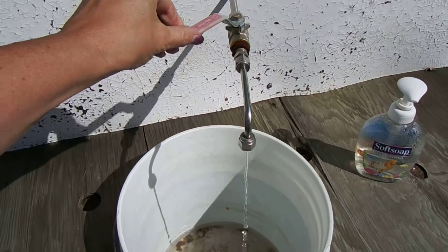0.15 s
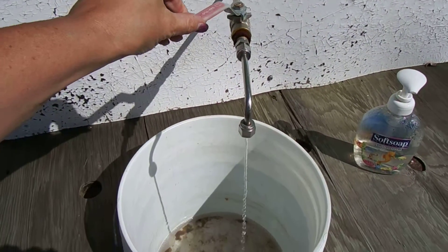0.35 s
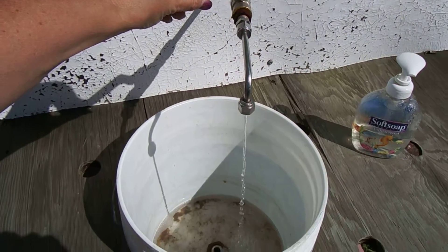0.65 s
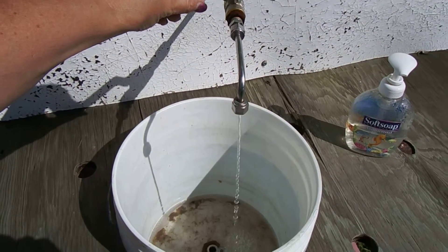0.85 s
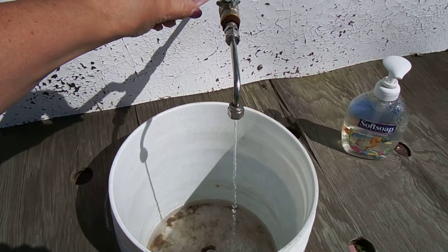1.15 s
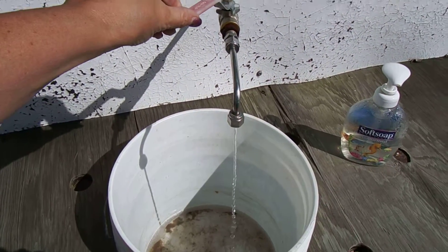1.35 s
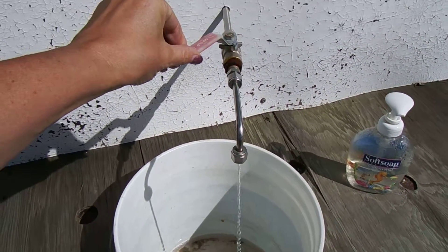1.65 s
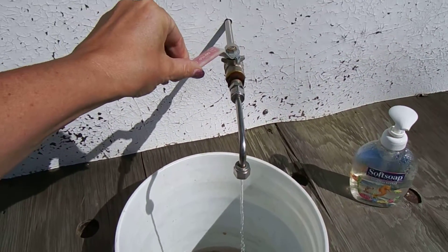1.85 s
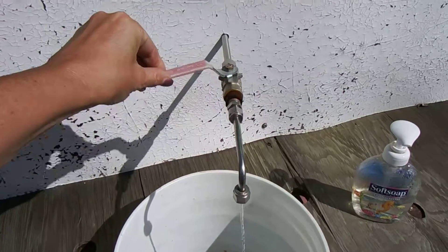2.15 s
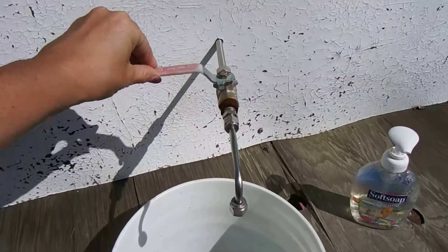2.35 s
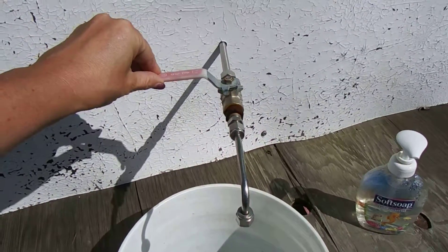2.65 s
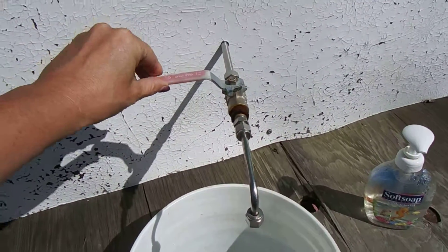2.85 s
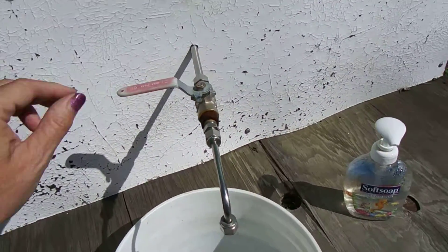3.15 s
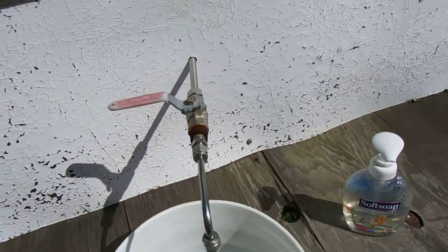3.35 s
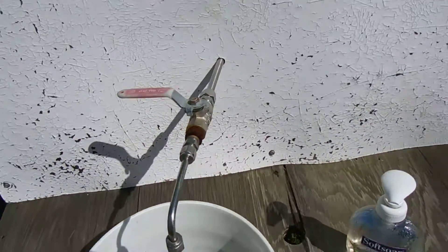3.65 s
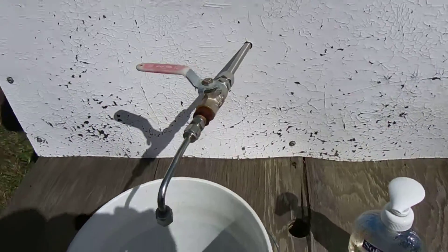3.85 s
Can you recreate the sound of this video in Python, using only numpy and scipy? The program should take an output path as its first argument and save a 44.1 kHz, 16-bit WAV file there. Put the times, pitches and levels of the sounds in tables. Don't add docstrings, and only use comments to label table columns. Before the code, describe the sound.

Close handheld microphone outdoors: water trickles and splashes into a hollow bucket from the start, breaks into last drops as the valve shuts, then near quiet with faint wind rumble, distant traffic and soft handling bumps.

```python
import sys
import numpy as np
from scipy import signal
from scipy.fft import rfft, irfft
from scipy.io import wavfile
from scipy.ndimage import uniform_filter1d

SR = 44100
rng = np.random.default_rng(int(sys.argv[2]) if len(sys.argv) > 2 else 0)


def gain_from_db(level_db):
    decades = np.asarray(level_db, float) / 20
    return 10 ** decades


def dump(signal):
    limited = np.clip(np.atleast_2d(signal).T, -1, 1)
    pcm = np.round(limited * 32767).astype(np.int16)
    wavfile.write(sys.argv[1], SR, pcm)


N = 176400
TIME = np.arange(N) / SR
BINS = np.fft.rfftfreq(8192, 1 / SR)


def evened(x):
    return x / np.sqrt(np.mean(x ** 2) + 1e-20)


def read(points, hz):
    f, value = np.transpose(points)
    return np.interp(np.log(hz + 1), np.log(f + 1), value)


def causal(x, gain):
    log = np.log(np.maximum(np.r_[gain, gain[-2:0:-1]], 1e-5))
    taps = np.fft.ifft(np.exp(log - 1j * signal.hilbert(log).imag)).real[:4096]
    return signal.oaconvolve(x, taps[None], axes=1)[:, :N]


def coloured(x, gain):
    return causal(x[None], gain)[0]


def highpass(x, order, hz):
    return signal.sosfilt(signal.butter(order, hz, "high", fs=SR, output="sos"), x)


def peaks(table, order=1):
    return sum(gain_from_db(db) ** 2 / (1 + (2 * (BINS - f) / w) ** 2) ** order for f, w, db in table)


def slow(seconds):
    size = max(int(seconds * SR), 2)
    return evened(uniform_filter1d(uniform_filter1d(rng.standard_normal(N), size), size))


def decay(samples, t60):
    return gain_from_db(-60 * np.arange(samples) / SR / t60)


def ping(hz, t60, rise, attack=.0003):
    t = np.arange(int(t60 * SR) + 8) / SR
    tone = np.sin(2 * np.pi * hz * t * (1 + rise * t / t60))
    return (1 - np.exp(-t / attack)) * gain_from_db(-60 * t / t60) * tone


def add(mix, s, sound):
    part = mix[..., round(s * SR):][..., :sound.shape[-1]]
    part += sound[..., :part.shape[-1]]


def scatter(x):
    z = signal.stft(x, nperseg=64)[2]
    turn = np.exp(2j * np.pi * rng.random((2,) + z.shape))
    return 1.25 * signal.istft(z * turn, nperseg=64)[1][:, :N]


def ports(shared, own, pan, lead, same):
    hz = np.fft.rfftfreq(N, 1 / SR)
    middle, sides = rfft(shared), rfft(own)
    likeness = np.sqrt(np.clip(read(same, hz), 0, 1))
    unlike = np.sqrt(1 - likeness ** 2)
    turn = gain_from_db(read(pan, hz) / 2) * np.exp(.5j * read(lead, hz))
    left = (likeness * middle + unlike * sides[0]) * turn
    right = (likeness * middle + unlike * sides[1]) / turn
    return irfft(np.array([left, right]), N)


# (frequency [Hz], density [dB per Hz])
TRAFFIC_COLOUR = [(30, -35), (140, -2.5), (1700, -9.5), (2100, -18.5), (4600, -24), (5600, -44),
                  (8500, -33), (12000, -38)]
# (frequency [Hz], left over right [dB])
TRAFFIC_PAN = [(100, -1), (800, -2), (1800, -8.5), (4200, -16), (6800, -24), (8500, -16)]
# (frequency [Hz], left leads by [radians])
TRAFFIC_LEAD = [(200, .2), (1000, -.5), (1700, -.2), (2200, 1.5), (3500, 1.2), (9000, 3)]
# (frequency [Hz], likeness [0-1])
TRAFFIC_SAME = [(60, .3), (300, .9), (1500, .85), (2200, .4), (4500, .2), (9000, .7)]
# (frequency [Hz], width [Hz], level [dB])
HOLLOW_MODES = [(154.7, 46.5, -12), (318, 35, -11.5), (364.8, 31.2, 0.5), (419.6, 29.3, -4)]


def traffic():
    colour = np.sqrt(gain_from_db(read(TRAFFIC_COLOUR, BINS)) ** 2 + gain_from_db(-1.5) ** 2 * peaks(HOLLOW_MODES))
    air = causal(rng.standard_normal((3, N)), colour) * gain_from_db(.5 * slow(.05))
    return gain_from_db(-49.5) * evened(ports(air[0], air[1:], TRAFFIC_PAN, TRAFFIC_LEAD, TRAFFIC_SAME))


# (time [s], level [dB])
WIND_LEVEL = [
    (0, -76),
    (2.38, -80),
    (2.47, -66),
    (2.7, -60),
    (2.95, -72),
    (3.27, -63),
    (3.5, -71),
    (4, -65),
]


def wind():
    gusts = rng.standard_normal((2, N)) * gain_from_db(4.2 * np.array([slow(.05), slow(.034)]))
    rumble = evened(causal(gusts, np.sqrt(peaks([(78.4, 54, 0)], order=2))))
    return gain_from_db(np.interp(TIME, *np.transpose(WIND_LEVEL))) * rumble


# (time [s], peak [dB], pitch [Hz])
HAND_BUMPS = [
    (2.695, -45, 105),
    (2.733, -38, 150),
    (3.265, -49, 85),
    (3.81, -45, 150),
    (2.47, -47, 70),
    (.343, -48, 40),
]


def hand_bumps():
    out = np.zeros((2, N))
    for at, db, hz in HAND_BUMPS:
        cycles = np.arange(-2, 2, hz / SR)
        bump = np.exp(-(cycles / 0.99) ** 2) * np.cos(2 * np.pi * cycles)
        add(out, at - 2 / hz, gain_from_db(db) * gain_from_db([[-3.], [2.4]]) * bump)
    return out


# (time [s], peak [dB])
FILM_TICKS = [(2.6015, -31.5), (2.895, -42), (2.8995, -41), (2.944, -40.5), (2.9914, -42), (3.4653, -41),
              (3.4885, -47), (3.5493, -35), (3.5915, -40), (3.6157, -35.5), (3.6653, -38)]
# (frequency [Hz], width [Hz], level [dB])
FILM_COLOUR = [(8550, 1100, 1.5), (4430, 1000, -9), (6900, 1100, -21)]


def film_ticks():
    ticks = np.zeros(N)
    for at, db in FILM_TICKS:
        add(ticks, at, gain_from_db(db) * rng.standard_normal(500) * decay(500, 0.025))
    return gain_from_db(3.0) * coloured(ticks, np.sqrt(peaks(FILM_COLOUR)))


RISE, SPLAT_RISE = 0.061, 0.0017

# (time [s], peak [dB], pitch [Hz])
GULP_EVENTS = [(0.335, -25.5, 1218), (0.64, -23.5, 1223), (0.751, -27.5, 1175), (.975, -24, 1240),
               (1.179, -23, 1236), (1.203, -26.5, 1265), (1.356, -25, 1220), (1.8, -24.5, 1057),
               (2.099, -26, 1216), (2.295, -26, 1227), (2.362, -25, 1057), (2.467, -29, 1054)]


def gulps():
    out, t60 = np.zeros(N), 0.059
    for at, db, hz in GULP_EVENTS:
        gulp = ping(hz, t60, RISE, attack=.003)
        gulp += .55 * ping(hz * .84, t60, RISE) + .3 * ping(hz * 1.3, t60, RISE)
        add(out, at, gain_from_db(db + 0.5) * gulp)
    return out


# (time [s], peak [dB], pitch [Hz])
DROPLETS = [(0.0692, -36, 2940), (0.2004, -21.5, 3050), (0.239, -29, 3140), (0.26, -23, 3040),
            (0.2912, -22, 2900), (0.3267, -22, 3130), (0.3701, -23.5, 2990), (0.403, -32, 4370),
            (0.4966, -25, 2880), (0.5374, -29.5, 4020), (0.755, -30, 3020), (0.791, -28, 2890),
            (0.8899, -24, 2930), (0.9124, -21.5, 4140), (0.948, -32, 2980), (1.0121, -28, 3350),
            (1.0272, -23, 3160), (1.1774, -22, 2870), (1.2993, -21, 3070), (1.433, -23.5, 2650),
            (1.5728, -28, 2870), (1.586, -25, 2940), (1.6018, -20, 2960), (1.6368, -25, 3110),
            (1.6718, -30, 2640), (1.741, -22.5, 2940), (1.7904, -23, 2990), (1.8626, -26, 3040),
            (1.9103, -28, 2880), (2.0016, -27, 2910), (2.1081, -34, 2900), (2.1418, -31, 2850),
            (2.2308, -23.5, 2940), (2.2583, -24, 2870), (2.283, -36, 2960), (2.313, -26, 2960),
            (2.404, -30, 3750)]


def plinks():
    out, t60 = np.zeros(N), 0.034
    for at, db, hz in DROPLETS:
        add(out, at, gain_from_db(db - 1.5) * (ping(hz, t60, SPLAT_RISE) + .4 * ping(hz * 0.8, t60, SPLAT_RISE)))
    return out


# (frequency [Hz], width [Hz], level [dB])
WALL_MODES = [(603, 56, -2.5), (910, 92, 1.5), (1071, 40, -4.5), (1255, 138, 3), (1966, 56, -5),
              (1535, 40, -12), (2585, 170, -3), (2960, 188, 0.5), (3470, 83, -10), (4140, 126, -3),
              (4540, 320, -4.5), (6100, 240, -13.5), (8360, 840, -11), (9880, 1500, -20)]
# (frequency [Hz], level [dB])
SPLASH_COLOUR = [(150, -32), (500, -26), (800, -12.5), (1600, -13.5), (3500, -10.5), (6000, -16.5),
                 (11000, -17.5), (16000, -30)]


def bucket_colour():
    return np.sqrt(peaks(WALL_MODES) + gain_from_db(read(SPLASH_COLOUR, BINS)) ** 2)


# (time [s], peak [dB])
WALL_SPITS = [(0.02, -36), (0.0495, -28), (0.0771, -29), (0.1466, -26.5), (0.2226, -29), (0.251, -25),
              (0.2852, -29), (0.3062, -31), (0.3293, -28), (0.399, -31), (0.4329, -33), (0.4498, -29),
              (0.4783, -36), (0.5452, -27), (0.575, -31), (0.5876, -30), (0.6404, -34.5), (0.6709, -34),
              (0.7357, -29), (0.8495, -27), (0.867, -22.5), (0.9123, -28), (0.9427, -29), (0.971, -28),
              (0.9956, -33), (1.025, -24), (1.0768, -29), (1.0958, -30), (1.1132, -28.5), (1.1333, -30),
              (1.1604, -26), (1.2, -38), (1.277, -23), (1.4267, -27.5), (1.4658, -29.5), (1.5005, -18),
              (1.5435, -25), (1.571, -29.5), (1.6272, -32), (1.6881, -31), (1.8353, -18), (1.8607, -33),
              (1.93, -33), (1.9941, -29.5), (2.0532, -28), (2.163, -28), (2.257, -36), (2.3022, -37),
              (2.3172, -26), (2.3424, -22.5), (2.425, -35), (2.4678, -28.5), (2.5034, -33.5), (2.5737, -39)]


def spits(colour):
    out = np.zeros(N)
    for at, db in WALL_SPITS:
        z = rng.standard_normal(1501)
        z = evened(z[1:] + np.tanh(z[0]) * z[:-1])
        add(out, at, gain_from_db(db) * decay(1500, 0.025) * z)
    bright = gain_from_db(read([(8000, 8), (15000, 2)], BINS))
    return gain_from_db(12) * coloured(highpass(out, 3, 5900), colour * bright)


SPLAT_T60 = 0.031

# (time [s], peak [dB], pitch [Hz])
SPLAT_EVENTS = [(0.3411, -11, 2970), (0.4334, -24, 4070), (0.5744, -18.5, 4550), (0.598, -17, 4410),
                (0.6707, -26, 2960), (1.1563, -22, 2910), (1.2262, -17, 4140), (1.2752, -15.5, 2960),
                (1.3167, -20, 2830), (1.501, -19, 2960), (1.6841, -18, 2660), (1.7175, -19.5, 2885),
                (1.7734, -20, 2920), (1.8337, -36, 2950), (1.93, -22, 3100), (2.0532, -23, 2900),
                (2.0703, -20.5, 2890), (2.3350, -21, 2930), (2.4385, -25, 2660), (2.468, -24, 1590),
                (2.5033, -29.5, 2646), (2.5412, -31.5, 3990)]


def splats(colour):
    rings, puffs = np.zeros(N), np.zeros(N)
    for at, db, hz in SPLAT_EVENTS:
        for ratio, share in [(1, 1), (1.12, .5), (1.4, .3)]:
            add(rings, at, gain_from_db(db - 1.7) * share * ping(hz * ratio, SPLAT_T60, SPLAT_RISE))
        z = rng.standard_normal(500)
        add(puffs, at, gain_from_db(db - 14) * (z[1:] - 0.7 * z[:-1]) * decay(499, .016))
    return rings + gain_from_db(15.5) * coloured(puffs, colour)


def boom(clump):
    shake = rng.standard_normal(N) * clump ** 0.71 * gain_from_db(0.73 * slow(0.017))
    return evened(coloured(shake, np.sqrt(peaks(HOLLOW_MODES, order=2))))


def bubbles():
    size_db = 3. * np.minimum(rng.exponential(1, N), 4.5)
    size = gain_from_db(size_db) * (rng.random(N) < 2600 / SR)
    kind, out = rng.integers(0, 32, N), np.zeros(N)
    for k, hz in enumerate(np.geomspace(500, 15000, 32)):
        grain = ping(hz, 22. / hz + .002, RISE)
        grain = grain / np.linalg.norm(grain) * (hz / 3000) ** .5
        out += signal.oaconvolve(size * (kind == k), grain)[:N]
    return out


def drop_smacks():
    size = gain_from_db(3. * rng.exponential(1, N).clip(0, 3))
    drops = size * (rng.random(N) < 160 / SR)
    smack = np.convolve(drops, decay(1200, SPLAT_T60))[:N] * rng.standard_normal(N)
    return evened(np.diff(smack, prepend=0) + .5 * smack)


def falling_water(clump, spray, lull_db, colour):
    drive = (evened(bubbles()) + gain_from_db(-6.5) * rng.standard_normal(N)) * clump
    drive = evened(drive) + gain_from_db(-13) * drop_smacks() * gain_from_db(lull_db)
    top = highpass(drive, 2, 5200)
    drive = drive - top + gain_from_db(-1.5) * top * evened(spray)
    return gain_from_db(1.0) * evened(coloured(drive, colour))


# (time [s], flow level [dB], hollow boom [dB])
STREAM_FLOW = [(0, -38.5, 1), (.12, -38.5, -6), (.3, -34.5, 1.5), (.5, -36.5, -1.5), (.62, -36, -6),
               (.76, -33.5, 2), (.9, -35.5, -7.5), (1, -33.5, 1.5), (1.1, -35.5, -3), (1.19, -33, -3),
               (1.42, -35.5, 0.5), (1.58, -35.5, -6), (1.8, -36.5, 3), (2, -37.5, -9.5), (2.2, -36, -0.5),
               (2.38, -35.5, 2), (2.47, -39, 1), (2.572, -51, 5.5)]
# (time [s], length [s], depth [dB])
STREAM_LULLS = [
    (0.379, 0.056, -3),
    (0.658, 0.018, -11),
    (0.715, 0.016, -5),
    (1.535, 0.011, -1),
    (1.909, 0.036, -5.5),
    (1.977, 0.03, -2),
    (2.496, 0.021, -7),
    (2.526, 0.01, -4),
]
# (frequency [Hz], left over right [dB])
STREAM_PAN = [(200, -0.5), (1300, -1), (2200, -6.5), (3200, -3), (3600, -5), (6900, -1), (8100, -6),
              (11000, 6.5)]
# (frequency [Hz], left leads by [radians])
STREAM_LEAD = [(300, .15), (1500, 0), (3000, .8), (4800, 1.8), (5300, .2), (7400, 1.2), (9300, 3.1),
               (15000, 2.3)]
# (frequency [Hz], likeness [0-1])
STREAM_SAME = [(200, .995), (1500, .97), (3000, .93), (5000, .65), (8200, .85), (15000, .6)]


def stream():
    s, flow_points, boom_points = np.transpose(STREAM_FLOW)
    flow_db, boom_db = np.interp(TIME, s, flow_points), np.interp(TIME, s, boom_points)
    flow = gain_from_db(flow_db) * (TIME < s[-1])
    lull_db = sum(db * np.exp(-((TIME - at) / long * 2) ** 4) for at, long, db in STREAM_LULLS)
    clump_db, clump_s = 1.3, 0.006
    clump = gain_from_db(clump_db * slow(clump_s) + lull_db)
    spray = gain_from_db(clump_db * 2.2 * slow(clump_s * 1.1) + .5 * lull_db + .5 * flow_db)
    colour = bucket_colour()
    water = falling_water(clump, spray, lull_db, colour) * flow
    water += boom(clump) * gain_from_db(-9 + boom_db) * flow
    water += splats(colour) + spits(colour) + plinks() + gulps() + film_ticks()
    return ports(water, scatter(water), STREAM_PAN, STREAM_LEAD, STREAM_SAME)


def scene():
    return traffic() + wind() + hand_bumps() + stream()


def low_pass(x):
    return signal.sosfilt(signal.butter(12, 16830, fs=SR, output="sos"), x)


# (frequency [Hz], width [Hz], depth [dB])
HOUSING_NOTCHES = [(465, 50, -7), (2480, 110, -22), (5030, 200, -24), (5650, 200, -10), (7480, 160, -12)]


def record(dry):
    response_db = sum(db / (1 + (2 * (BINS - f) / w) ** 2) for f, w, db in HOUSING_NOTCHES)
    response_db = response_db - 14 / (1 + (BINS / 32) ** 4)
    response_db = response_db - 60 / (1 + np.exp((16000 - BINS) / 100))
    hiss = gain_from_db(-60.5) * rng.standard_normal(dry.shape)
    x = causal(dry + hiss, gain_from_db(response_db))
    power_db = 10 * np.log10(abs(uniform_filter1d((x ** 2).mean(0), 200)) + 1e-12)
    fall = TIME * 170.0
    held_db = np.maximum.accumulate(power_db + fall) - fall
    over_db = np.maximum(held_db + 26.0, 0)
    late_db = np.r_[np.zeros(400), uniform_filter1d(over_db, 200)][:N]
    return low_pass(x / gain_from_db(0.75 * late_db))


dry = scene()
out = record(dry)
dump(out)
```